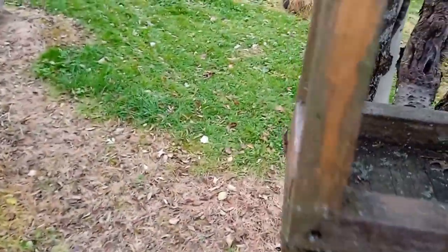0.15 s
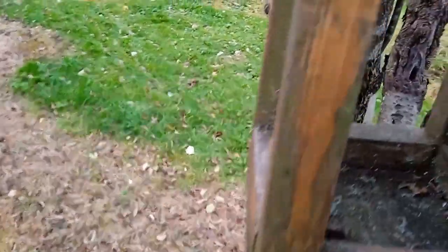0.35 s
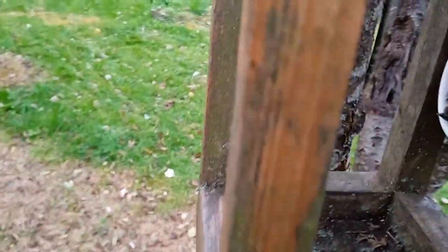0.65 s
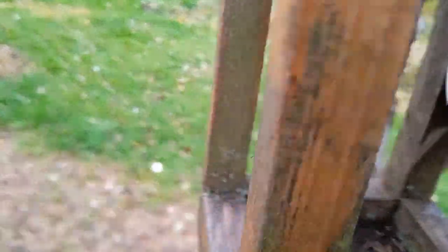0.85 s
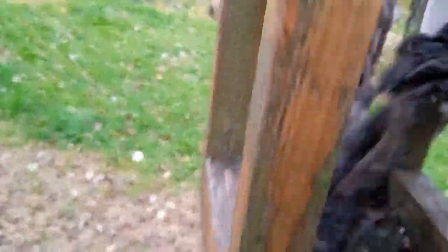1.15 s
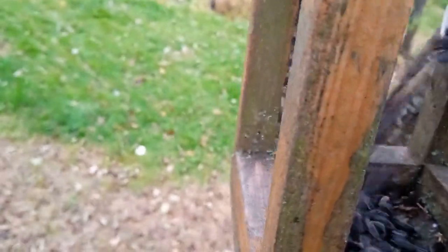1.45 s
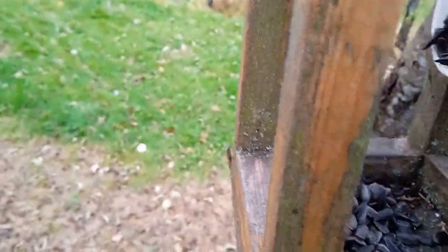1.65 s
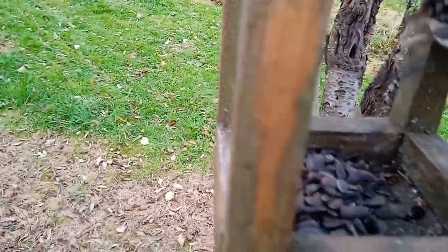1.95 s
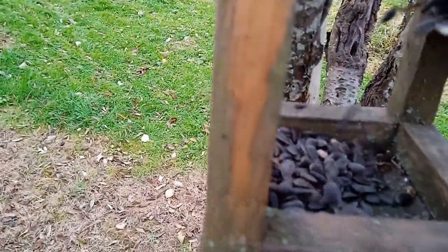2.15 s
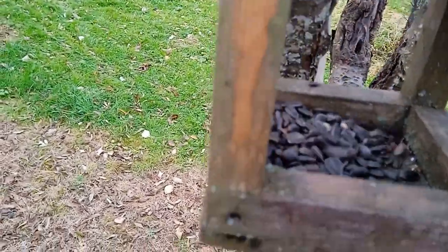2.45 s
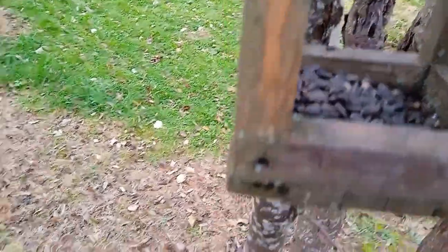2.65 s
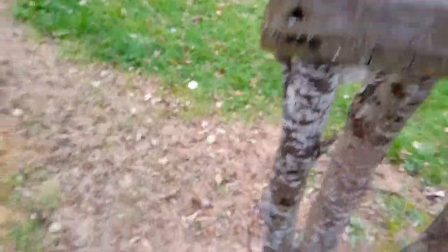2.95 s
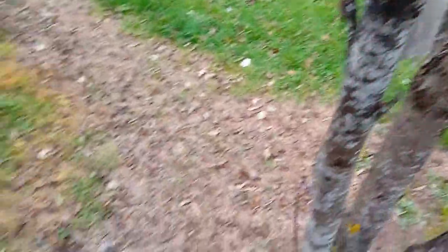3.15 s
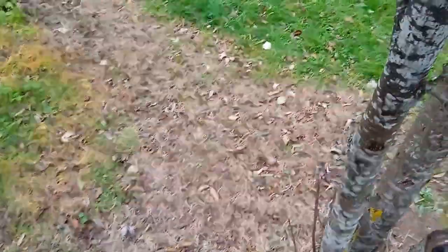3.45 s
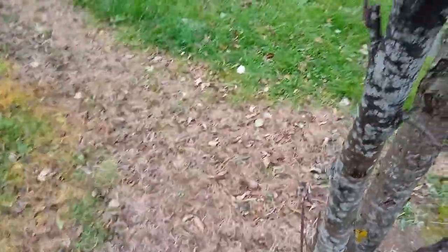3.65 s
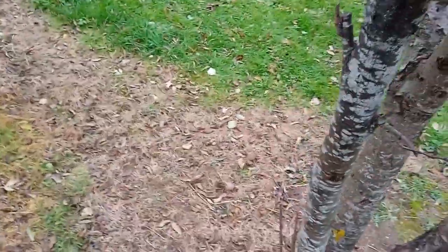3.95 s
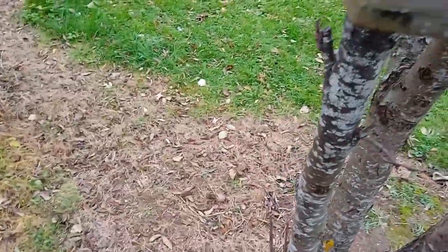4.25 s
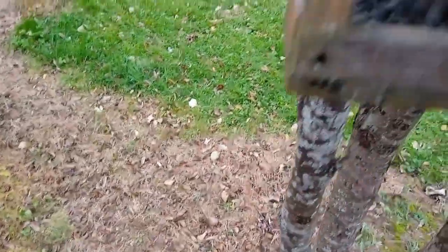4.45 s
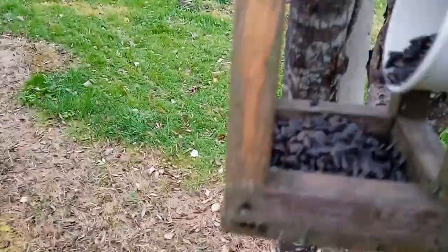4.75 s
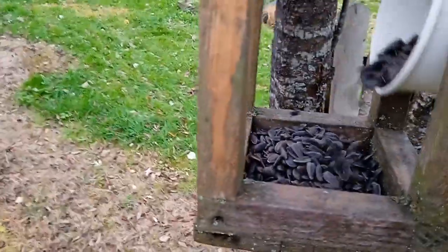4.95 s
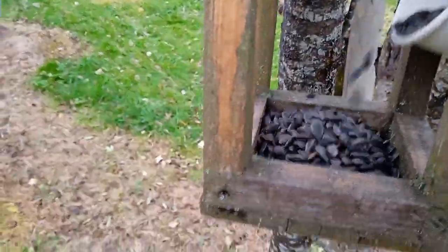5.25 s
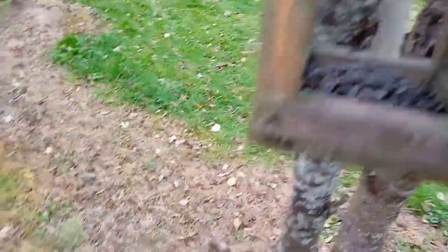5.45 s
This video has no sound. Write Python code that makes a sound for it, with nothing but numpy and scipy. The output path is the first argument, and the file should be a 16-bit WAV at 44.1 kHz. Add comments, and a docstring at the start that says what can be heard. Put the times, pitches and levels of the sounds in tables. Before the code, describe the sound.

Seeds slide and crackle in a plastic tub, pour in a rattling burst onto a wooden feeder tray, then rattle and clatter again outdoors.

```python
"""Seeds slide and crackle in a plastic tub, then patter down on a wooden feeder tray in a quiet garden.
The slides are dense random contacts, filtered by the husks and by the wall and hollow of the tub.
Streams ring the modes of the bare wood, which is muffled as seeds cover it; later spurts tick on the heap.
Slumps, hard cracks and blows stand out as noise bursts with short rings; dull handling bumps are damped low
swings; shaped noise makes low rubbing and outdoor air. All is heard close by, through a hand-held phone."""
import sys
import numpy as np
from scipy import signal
from scipy.fft import rfft, irfft
from scipy.io import wavfile
from scipy.ndimage import uniform_filter1d

SR = 44100
rng = np.random.default_rng(int(sys.argv[2]) if len(sys.argv) > 2 else 0)


def store_pcm(level_fs):
    """Save levels as 16-bit WAV."""
    pcm = np.round(np.clip(level_fs, -1, 1) * 32767).astype(np.int16)
    wavfile.write(sys.argv[1], SR, np.atleast_2d(pcm).T)


N = 246519  # length in samples

# colour of husks rubbing, in slides and slumps: (pitch_hz, level_db)
HISS_COLOUR = [(150, -8), (350, -1.5), (550, -10.5), (1200, 0), (2300, -3), (3300, 3.5), (4300, -1.5),
               (5300, -1.5), (6800, 1), (8500, -6), (11000, -16), (13000, -11), (16000, -40)]


def undb(db):
    """Decibels to gain."""
    return 10 ** (np.asarray(db) / 20)


def unit(x):
    """Scale to rms 1."""
    return x / np.sqrt(np.mean(x ** 2) + 1e-20)


def add(track, s, sound):
    """Mix a short sound into a track at time s."""
    i = int(np.clip(s * SR, 0, N - 1))
    track[i:i + len(sound)] += sound[:N - i]


def band(x, hz, width_hz):
    """One resonance, gain 1 at its centre; pitch and width are kept within the filter's range."""
    hz = min(hz, 0.45 * SR)
    b, a = signal.iirpeak(hz, hz / min(width_hz, SR / 3), fs=SR)
    return signal.lfilter(b, a, x)


def colour(x, points, size=2048):
    """Minimum-phase filter of unit energy, shaped through (Hz, dB) points."""
    hz, db = np.transpose(points)
    grid_hz = np.linspace(1, SR / 2, size // 2 + 1)
    log_gain = np.log(undb(np.interp(np.log(grid_hz), np.log(hz), db)))
    # folding the cepstrum onto positive time puts the energy at the start of the response
    cepstrum = irfft(log_gain)[:size // 2]
    response = irfft(np.exp(rfft(2 * cepstrum, size)))[:size // 2]
    return signal.fftconvolve(x, response / np.linalg.norm(response))[:len(x)]


def gliding(x, hz, width_hz):
    """A resonance whose centre follows hz sample by sample; it keeps the power of x."""
    turn = np.exp(2j * np.pi * np.cumsum(hz) / SR)
    lowpass = signal.butter(2, width_hz / 2, fs=SR, output="sos")
    # shift the centre down to zero, filter there and shift back up
    ring = (signal.sosfilt(lowpass, x / turn) * turn).real
    return unit(ring) * np.sqrt(np.mean(x ** 2))


def gesture(s, length, attack_s, release_s):
    """Envelope of one movement: it rises from time s, holds until s + length and dies away."""
    age = np.arange(N) / SR - s
    return np.clip(age / attack_s, 0, 1) * np.exp(-np.clip((age - length) / release_s, 0, 20))


def grains(rate, spread_db, even_s):
    """Random contacts, rate per second, of unequal force; their power is evened out over even_s."""
    strength = undb(spread_db * np.minimum(rng.exponential(size=N), 4))
    force = strength * rng.choice([-1, 1], N)
    hits = force * (rng.random(N) < rate / SR)
    span = int(even_s * SR) + 1
    power = uniform_filter1d(uniform_filter1d(hits ** 2, span), span)
    return hits / np.sqrt(np.abs(power) + 1e-6)


def chatter(hits, decay_s, share):
    """Each contact is followed by a brief scrape of the husk, which takes a share of its power."""
    pole = np.exp(-1 / (decay_s * SR))
    power = signal.lfilter([1 - pole], [1, -pole], hits ** 2)
    scrape = np.sqrt(share * power) * rng.standard_normal(len(hits))
    return np.sqrt(1 - share) * hits + scrape


def husks(hits, low_hz, high_hz, width_share, count=14):
    """Seeds of different sizes: each contact rings briefly at one of count pitches."""
    kind = rng.integers(0, count, N)
    out = np.zeros(N)
    for k, hz in enumerate(np.geomspace(low_hz, high_hz, count)):
        own = chatter(hits * (kind == k), decay_s=0.0015, share=0.78)
        out += band(own, hz, width_share * hz)
    return out * np.sqrt(np.mean(hits ** 2) / np.mean(out ** 2))


def wall_pitch():
    """Pitch of the tub wall at every sample, in Hz: it sinks as the tub empties."""
    full_hz, sag_hz_per_s = 1910, 48
    return full_hz - sag_hz_per_s * np.arange(N) / SR


def plastic(x, soft_hz=11000):
    """Contacts set off a stiff mode of the tub, whose plastic swallows the highest treble."""
    panel_hz, panel_width_hz, panel_db = 3370, 420, -9
    rung = x + undb(panel_db) * band(x, panel_hz, panel_width_hz)
    return undb(-1) * signal.sosfilt(signal.butter(4, soft_hz, fs=SR, output="sos"), rung)


def tray(force, size=8192, count=3):
    """The wooden tray rings; its modes add with different signs from spot to spot, at nearly equal strength."""
    # modes of the wood: (pitch_hz, width_hz, level_db)
    wood_modes = [(768, 67, -15), (1086, 44, -0.5), (1412, 26, 0.5), (1542, 42, -3.5), (1633, 99, -11),
                  (1910, 90, -4.5), (2226, 47, -8.5), (2546, 40, 1), (3024, 120, -10.5), (3600, 42, -8),
                  (4940, 390, -16)]
    tap = signal.unit_impulse(size)
    spot = rng.integers(0, count, N)
    out = np.zeros(N)
    for k in range(count):
        signs = rng.choice([-1, 1], len(wood_modes))
        weights = signs * undb(0.5 * rng.standard_normal(len(wood_modes)))
        response = np.zeros(size)
        for weight, (hz, width_hz, db) in zip(weights, wood_modes):
            response += weight * undb(db) * band(tap, hz, width_hz)
        out += signal.fftconvolve(force * (spot == k), response / np.linalg.norm(response))[:N]
    return out


def tilts():
    """Tilts and shakes: gains of hiss, sheen, hollow and wall, and the force spread weighted by hiss power."""
    # each tilt or shake sets the seeds sliding; levels are layer gains at the middle of the swell:
    # (start_s, length_s, husk_hiss_db, fine_sheen_db, hollow_db, wall_db, swell_start_to_end_db, force_spread_db)
    slides = [(0.0, .215, -55.5, -76, -59.5, -57.5, -2.5, 0.5),
              (0.263, 0.22, -54, -84, -57.5, -50, 1.5, 5.5), (0.487, 0.17, -45.5, -74, -54, -47.5, -12, 8),
              (0.791, 0.27, -50, -66, -56, -50, -4.5, 4), (0.943, 0.04, -44, -56, -46, -47.5, 0, 3),
              (1.032, 0.17, -42, -65, -50, -45, 4.5, 5), (1.78, 0.5, -56.5, -68, -62.5, -61, 0, 6.5),
              (2.385, 0.099, -49, -57, -54.5, -50.5, -2, 5.5), (2.517, 0.18, -52, -70, -54, -51.5, 3, 4.5),
              (2.691, 0.16, -42, -64, -49.5, -49, -5, 6.5), (2.847, 0.15, -34, -45.5, -47, -60, 5.5, 4),
              (3.019, 0.11, -38.5, -46, -52, -60, 7, 6.5), (3.146, 0.25, -60, -56.5, -57, -61, -8, 4.5),
              (3.599, 0.13, -42.5, -54.5, -57.5, -52.5, 4.5, 7),
              (3.863, 0.1, -43, -72, -45.5, -48.5, -2, 6.5), (4.017, 0.16, -45, -56.5, -55.5, -53, 4.5, 6),
              (4.189, 0.11, -41.5, -55, -43.5, -43.5, -4.5, 3.5),
              (4.261, 0.26, -44.5, -54, -52, -50.5, 4, 6), (4.527, 0.262, -51, -67, -54.5, -54.5, -3.5, 8),
              (4.823, 0.037, -51.5, -66, -43, -56, 4, 5.5), (4.897, 0.069, -48.5, -72, -67, -56.5, -2, 7),
              (4.965, 0.15, -48.5, -69, -55.5, -54.5, 8, 6), (5.14, 0.098, -49, -55, -77, -70, -1, 9.5),
              (5.435, 0.099, -49, -65, -47.5, -47.5, 9, 1.5)]
    # the seeds never lie quite still in the hand-held tub: (hiss_db, sheen_db, hollow_db, wall_db)
    creep_db = (-64, -80, -68, -64.5)
    creep_spread_db = 3.5
    t = np.arange(N) / SR
    power = np.outer(undb(creep_db), np.ones(N)) ** 2
    grit = creep_spread_db * power[0]
    for s, length, hiss_db, sheen_db, hollow_db, wall_db, swell_db, spread_db in slides:
        progress = np.clip((t - s) / length, 0, 1)
        # the load gets moving, and comes to rest
        motion = gesture(s, length, attack_s=0.032, release_s=0.023)
        motion = motion * undb(swell_db * (progress - 0.5))
        own = np.outer(undb([hiss_db, sheen_db, hollow_db, wall_db]), motion) ** 2
        power = power + own
        grit = grit + spread_db * own[0]
    return (*np.sqrt(power), grit / power[0])


def sliding():
    """Husks rub over each other and the plastic: a dense crackle that also stirs the tub's wall and hollow."""
    # colour of the air in the tub: (pitch_hz, level_db)
    hollow_colour = [(150, -8.5), (380, -5.5), (540, -24), (700, -1.5), (840, 4.5), (1000, 3), (1200, 2),
                     (1450, -4.5), (2200, -18.5), (6000, -35)]
    # colour of the tub wall: (pitch_hz, level_db)
    wall_colour = [(500, -17.5), (1100, -25.5), (1450, 6), (1750, 5.5), (2000, 3), (2350, 4.5),
                   (3000, -8.5), (6000, -29)]
    sheen_hz, sheen_width_hz = 8500, 6200  # smooth husks skating over each other
    hiss_gain, sheen_gain, hollow_gain, wall_gain, grit_db = tilts()
    hits = grains(rate=3000, spread_db=grit_db, even_s=0.018)
    rub = chatter(hits, decay_s=0.00078, share=0.83)
    seeds = husks(hits, low_hz=1460, high_hz=12260, width_share=0.38)
    crackle = undb(-2.5) * seeds + undb(-22) * rub
    hiss = colour(crackle * hiss_gain, HISS_COLOUR)
    skating = band(band(rub, sheen_hz, sheen_width_hz), sheen_hz, sheen_width_hz)
    sheen = sheen_gain * unit(skating)
    hollow = colour(rub * hollow_gain, hollow_colour)
    wall = undb(-3) * colour(rub, wall_colour) + undb(-12) * gliding(rub, wall_pitch(), width_hz=480)
    return hiss + sheen + hollow + wall * wall_gain


def pouring():
    """The dense stream hits bare wood and thins to single seeds; the fallen seeds muffle the tray."""
    # streams falling on the tray, levels before thinning and muffling: (start_s, length_s, husk_db, wood_db)
    pours = [(1.212, 0.56, -35.5, -29), (1.935, 0.16, -52.5, -50), (2.088, 0.036, -57.5, -53.5),
             (2.147, 0.089, -52, -50.5), (2.302, 0.0085, -48, -44)]
    # colour of seeds landing: (pitch_hz, level_db)
    husk_colour = [(150, -39), (550, -33), (900, 3), (1800, 1), (3200, 1), (4300, -1), (6000, 1.5),
                   (8000, -0.5), (11000, -3.5), (16000, -7)]
    hold_s, thin_db_per_s = 0.18, 46  # a stream runs full, then thins out
    cover_db_per_s = 49  # fallen seeds cover the wood
    straggler_rate, stream_rate = 380, 1900  # seeds per second; they add up in the fullest stream
    flow, wood = np.zeros((2, N))
    for s, length, husk_db, wood_db in pours:
        age = np.maximum(np.arange(N) / SR - s, 0)
        stream = gesture(s, length, attack_s=0.0062, release_s=0.013)
        flow += stream * undb(husk_db - thin_db_per_s * np.maximum(age - hold_s, 0))
        wood += stream * undb(wood_db - cover_db_per_s * age)
    rate = straggler_rate + stream_rate * (flow / flow.max()) ** 2
    hits = grains(rate, spread_db=5, even_s=0.03)
    seeds = husks(hits, low_hz=2000, high_hz=14000, width_share=0.2)
    scrape = chatter(hits, decay_s=0.0005, share=0.8)
    patter = undb(-1) * seeds + undb(-8) * scrape
    return colour(patter * flow, husk_colour) + tray(hits * wood)


def topping_up():
    """Seeds land on seeds: bright husk ticks, with a little of their force reaching the wood."""
    # spurts falling on the heap, level of the contact force: (start_s, length_s, level_db)
    spurts = [(4.18, 0.043, -44), (4.3, 0.066, -45.5), (4.45, 0.15, -52), (4.649, 0.023, -48),
              (4.71, 0.097, -56), (4.96, .055, -51), (5.067, .2, -55)]
    # colour of seed on seed: (pitch_hz, level_db)
    tick_colour = [(1000, -29), (4000, -27), (7000, 7), (10000, 2), (13000, 3), (16000, -1)]
    flow = np.zeros(N)
    for s, length, db in spurts:
        flow += undb(db) * gesture(s, length, attack_s=0.012, release_s=0.015)
    hits = grains(rate=960, spread_db=8, even_s=0.17) * flow
    scrape = chatter(hits, decay_s=0.002, share=1.0)
    seeds = husks(hits, low_hz=3000, high_hz=14900, width_share=0.12)
    ticks = undb(-1) * scrape + undb(-2) * seeds
    return undb(-2) * colour(ticks, tick_colour) + undb(-3) * tray(hits)


def slumps(size=4410):
    """A jolt throws many seeds against the tub at once; its hollow rings at a pitch set by where the load lies."""
    # the load slumps against the wall; level ahead of the plastic, hollow relative to it:
    # (start_s, length_s, level_db, hollow_db, hollow_pitch_hz)
    jolts = [(1.076, 0.017, -47, 13, 920), (3.587, 0.024, -29.5, -8, 1090),
             (3.601, 0.0065, -28.5, 3.5, 1080), (3.699, 0.022, -41, -3, 900), (3.924, 0.011, -39, -3, 925),
             (4.066, 0.029, -46.5, 4, 1130), (4.2265, 0.0018, -45.5, 11, 1150),
             (4.238, 0.00093, -41, 17, 1030), (4.431, .041, -49, 8.5, 1120), (4.573, 0.014, -44, 0.5, 856),
             (4.667, .015, -53, 9.5, 1100), (4.851, 0.048, -61.5, 13.5, 2140),
             (4.997, 0.022, -57, 9.5, 1140), (5.332, 0.0021, -48, -21, 1100), (5.355, 0.006, -38, -2, 865),
             (5.382, 0.0013, -39.5, 2, 900), (5.526, 0.0083, -37, -15, 1580),
             (5.554, 0.021, -47, 8.5, 1620), (5.5805, 0.0015, -36, 13.5, 1750)]
    hiss, hollow = np.zeros((2, N))
    t = np.arange(size) / SR
    for s, length, db, hollow_db, hz in jolts:
        jolt = undb(db) * np.exp(-np.maximum(t - length, 0) / 0.0052)
        rub = rng.standard_normal(size)
        main_ring = band(band(rub, hz, 0.28 * hz), hz, 0.64 * hz)
        upper_ring = band(band(rub, 1.29 * hz, 0.5 * hz), 4.2 * hz, hz)
        add(hiss, s, jolt * rng.standard_normal(size))
        add(hollow, s, jolt * undb(hollow_db) * unit(main_ring + 0.78 * upper_ring))
    return plastic(colour(hiss, HISS_COLOUR) + hollow)


def clicks(size=1024, count=132):
    """A hard contact: a brief crunch with a short ring at its own pitch, a bright snap and a knock into the tray."""
    # hardest cracks of seeds against the tub, level before trims: (start_s, level_db, pitch_hz)
    cracks = [(0.306, -29, 2140), (.4157, -33.5, 2040), (.4737, -25, 4800), (0.5381, -22.5, 3800),
              (0.5527, -21.5, 4940), (0.5599, -22.5, 3680), (0.624, -28.5, 2100), (1.1184, -26.5, 5260),
              (1.177, -19.5, 4400), (1.186, -26.5, 3370), (1.967, -28.5, 5070), (1.974, -33, 2600),
              (2.0393, -34, 6300), (2.1447, -32.5, 5540), (2.605, -27, 4400), (2.641, -27.5, 1820),
              (2.6574, -25, 4700), (2.6656, -27, 2600), (2.705, -20, 2230), (2.718, -27, 3580),
              (2.7254, -24.5, 4480), (2.7486, -26, 3740), (2.8006, -23, 3460), (2.8127, -27, 3700),
              (2.8311, -25, 4320), (2.8646, -21.5, 3950), (2.885, -15, 4080), (2.898, -18.5, 3600),
              (2.909, -16, 3800), (2.9152, -17, 4570), (2.9326, -29, 4110), (2.9441, -15.5, 5000),
              (2.9499, -18.5, 3780), (2.963, -15.5, 4460), (2.9951, -13, 6600), (3.0132, -21.5, 5900),
              (3.0325, -20.5, 5470), (3.0357, -20, 5740), (3.109, -18, 6440), (3.2187, -25.5, 5200),
              (3.2923, -34.5, 3270), (3.602, -23.5, 1630), (3.6087, -19, 1570), (3.818, -30.5, 3000),
              (4.438, -31, 4320), (4.5102, -28.5, 5600), (4.647, -30.5, 3500), (4.6718, -29.5, 6600),
              (5.094, -33.5, 3200), (5.1228, -26, 3600), (5.187, -30.5, 4430), (5.5268, -24.5, 2270),
              (5.5701, -31, 2700), (5.5839, -21.5, 1990)]
    # single hard blows on the tray, levels before trims: (start_s, wood_db, contact_db, bright_snap_db)
    blows = [(0.7145, -29.5, -23, -70), (.7642, -43, -32, -40.5), (1.0865, -31, -31, -64),
             (1.2185, -29, -38, -60), (1.311, -53, -26.5, -48), (1.378, -33, -24, -39),
             (1.416, -36, -50, -34), (1.474, -39, -36, -51), (1.5366, -34, -29.5, -50),
             (1.581, -41, -45, -33), (1.656, -38.5, -31, -52), (1.6928, -38.5, -38, -56),
             (1.7194, -41.5, -40, -45), (1.7681, -66, -35, -29.5), (1.9454, -35.5, -46, -65),
             (2.0024, -36, -38, -62), (2.022, -34.5, -35.5, -53), (2.154, -36.5, -42, -44),
             (2.204, -45, -48, -35.5)]
    # colour of the bright snap: (pitch_hz, level_db)
    snap_colour = [(1000, -51), (4000, -40), (7000, 19), (11000, 3), (16000, 16)]
    base_snap_db, base_hz, snap_db_per_octave = -27, 4000, 5  # higher cracks snap brighter
    knock_db = -24.5  # share of a crack that reaches the tray
    blow_hz = 3550  # pitch of a contact with the wood
    contacts = []
    for s, db, hz in cracks:
        snap_db = db + base_snap_db + snap_db_per_octave * np.log2(hz / base_hz)
        contacts.append((s, db, hz, snap_db, db + knock_db))
    for s, wood_db, db, snap_db in blows:
        contacts.append((s, db, blow_hz, snap_db, wood_db))
    body, snap, knock = np.zeros((3, N))
    t = np.arange(size) / SR
    strength = np.sqrt(count)  # levels are rms over count samples, 3 ms
    for s, db, hz, snap_db, wood_db in contacts:
        fade = np.exp(-(t / 0.0016) ** 2) + 0.25 * np.exp(-t / 0.002)
        crunch = rng.standard_normal(size) * fade
        force = crunch + 2.3 * signal.unit_impulse(size)
        broad = band(band(force, hz, 1.37 * hz), hz, 1.3 * hz)
        ring = broad + undb(-5.5) * band(force, 0.956 * hz, 0.057 * hz)
        add(body, s, strength * undb(db - 5.5) * ring / np.linalg.norm(ring))
        split = rng.standard_normal(size) * np.exp(-(t / 0.003) ** 2)
        add(snap, s, strength * undb(snap_db - 0.5) * split / np.linalg.norm(split))
        add(knock, s, [strength * undb(wood_db)])
    wall = undb(-16) * gliding(body, wall_pitch(), width_hz=570)
    return plastic(body) + wall + colour(snap, snap_colour) + tray(knock)


def bumps():
    """Handling bumps: a soft push, one cycle long, sets off a low, quickly damped swing."""
    # dull bumps, peak before the band filter and its gain: (start_s, peak_db, pitch_hz, t60_s)
    pushes = [(.039, -45.5, 100, 0.11), (0.453, -37, 85, 0.06), (0.516, -32.5, 113, 0.07),
              (0.54, -34, 124, 0.11), (.541, -29, 213, 0.016), (0.555, -28.5, 78.6, 0.13),
              (0.662, -32, 111, 0.045), (0.678, -26, 94.6, 0.073), (0.681, -30.5, 200, 0.011),
              (0.752, -25.5, 79.5, 0.033), (2.54, -40, 75, 0.097), (2.6, -43, 70, .06),
              (2.811, -29.5, 88, 0.044), (3.901, -45.5, 80, .08), (4.462, -30.5, 93, 0.014),
              (4.561, -46, 140, 0.11), (4.585, -30, 71, 0.073), (4.645, -42.5, 94, .083),
              (5.354, -27, 104, 0.016), (5.521, -35, 85.4, 0.025)]
    out = np.zeros(N)
    t = np.arange(SR // 5) / SR
    for s, db, hz, t60 in pushes:
        swing = np.sin(2 * np.pi * hz * t) * np.exp(-np.log(1000) * t / t60)
        thud = np.convolve(swing, np.hanning(int(SR / hz)))
        add(out, s, undb(db) * thud / np.abs(thud).max())
    return undb(4) * band(band(out, 160, 260), 160, 260)


def low_rubbing():
    """Low rubbing that swells: noise in a band around 300 Hz."""
    # swells of low rubbing: (middle_s, half_width_s, level_db)
    rubs = [(.55, 0.048, -61), (2.15, 0.33, -63), (3.5, 0.99, -63.5), (4.65, 0.13, -53.5),
            (5.35, 0.27, -60.5)]
    t = np.arange(N) / SR
    swells = np.zeros(N)
    for s, width, db in rubs:
        swells += undb(db) * np.exp(-((t - s) / width) ** 2)
    return unit(band(band(rng.standard_normal(N), 296, 210), 296, 210)) * swells


def garden():
    """Faint outdoor air and an uneven rumble, both of filtered noise."""
    # colour of the outdoor air: (pitch_hz, level_db)
    air_colour = [(25, -19), (70, -3.5), (140, -3.5), (320, -10.5), (600, -8), (1200, -17.5), (3000, -23.5),
                  (7000, -22), (11000, -28), (16000, -31)]
    air_db, rumble_db = -58.5, -84  # levels around which the gusts wander
    t = np.arange(N) / SR
    gusts = rng.standard_normal(size=40)
    gust = np.interp(t, np.linspace(0, t[-1], len(gusts)), gusts)
    air = unit(colour(rng.standard_normal(N), air_colour)) * undb(air_db + 0.62 * gust)
    rumble = unit(band(band(rng.standard_normal(N), 82, 57), 82, 57)) * undb(rumble_db + 3.3 * gust)
    return air + rumble


def feeder(x):
    """The boards and the tub close by throw the treble of each contact back within a few milliseconds."""
    # echoes off the boards and the tub: (delay_ms, level_db)
    echoes = [(1.13, -20), (1.91, -22.5), (3.07, -17.5), (4.6, -19)]
    # only the treble above 2500 Hz is echoed
    treble = signal.sosfilt(signal.butter(2, 2500, "high", fs=SR, output="sos"), x)
    out = x.copy()
    for ms, db in echoes:
        add(out, ms / 1000, undb(db) * treble)
    return undb(-0.05) * out


def scene():
    """All sources at one microphone in the open air; bumps, low rubbing and garden get no echoes."""
    seeds = sliding() + pouring() + topping_up() + slumps() + clicks()
    return (feeder(seeds) + bumps() + low_rubbing() + garden())[None]


def record(dry):
    """The microphone port dips and then rings in the top treble; the recorder cuts off above it."""
    dip_hz, dip_width_hz, dip_depth = 12600, 4100, 0.43
    port_hz, port_width_hz, port_db = 15300, 2000, 7.5
    top_hz = 16000
    dipped = dry - dip_depth * band(dry, dip_hz, dip_width_hz)
    ring = band(band(dipped, port_hz, port_width_hz), port_hz, port_width_hz)
    bright = dipped + undb(port_db) * ring
    cutoff = signal.ellip(10, 0.2, 80, top_hz, fs=SR, output="sos")
    return signal.sosfilt(cutoff, bright)


dry = scene()
out = record(dry)
store_pcm(out)
```